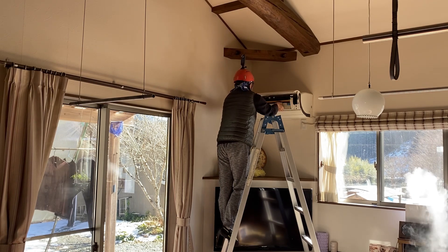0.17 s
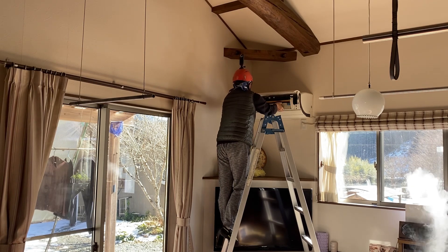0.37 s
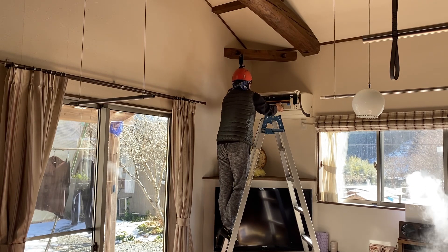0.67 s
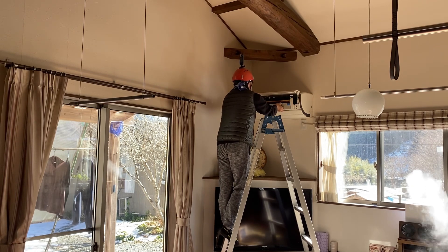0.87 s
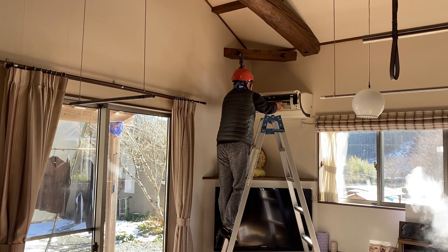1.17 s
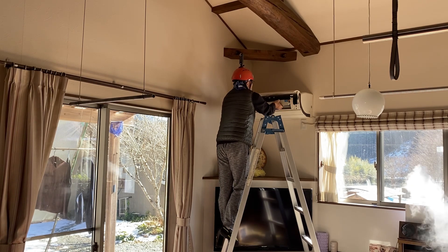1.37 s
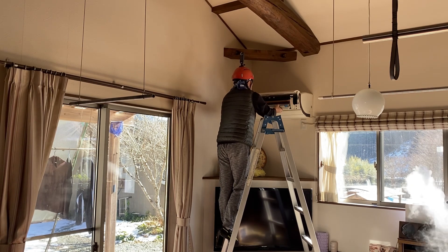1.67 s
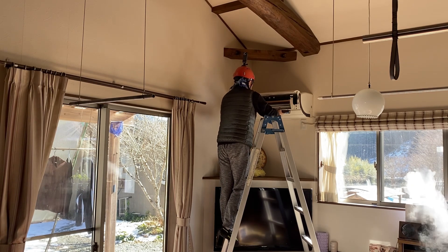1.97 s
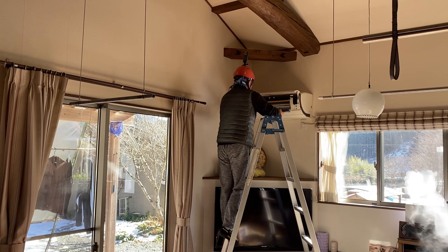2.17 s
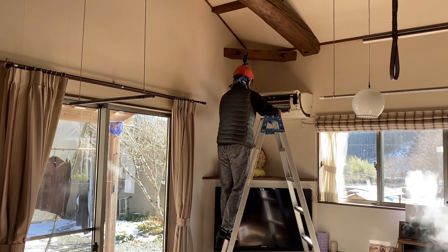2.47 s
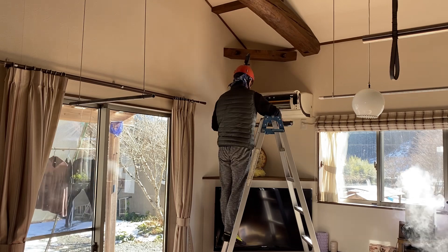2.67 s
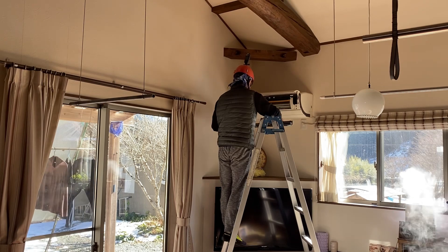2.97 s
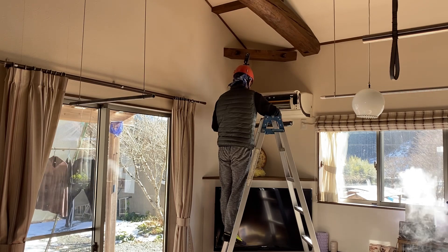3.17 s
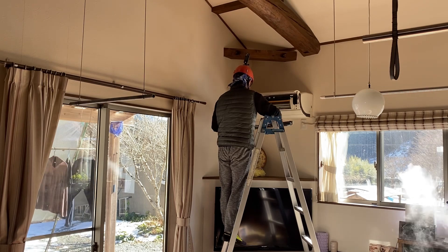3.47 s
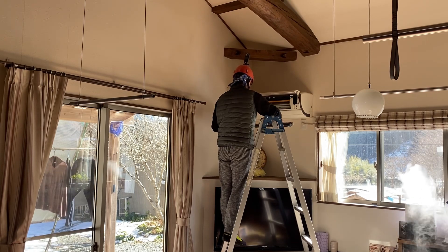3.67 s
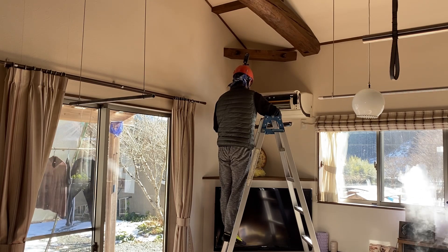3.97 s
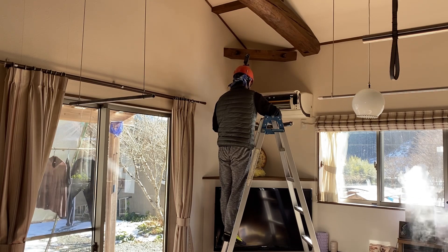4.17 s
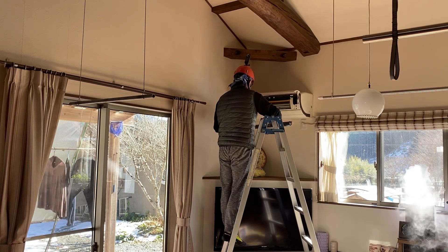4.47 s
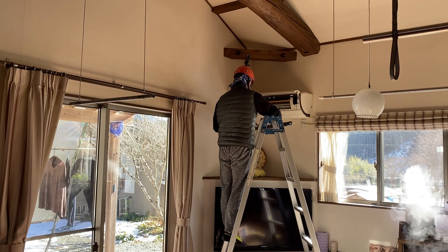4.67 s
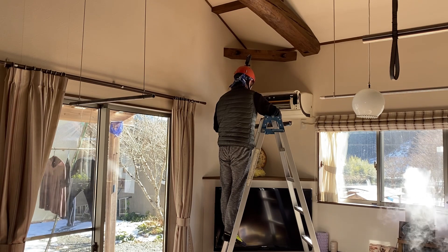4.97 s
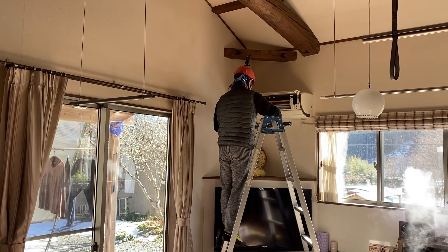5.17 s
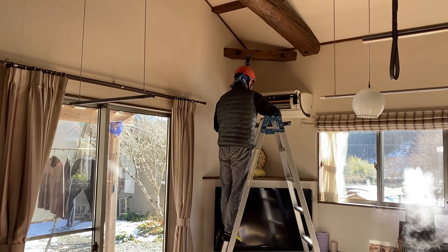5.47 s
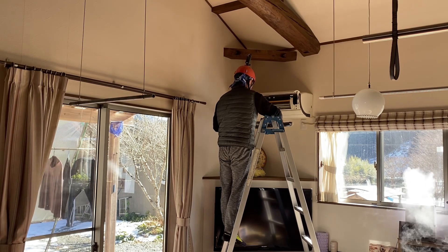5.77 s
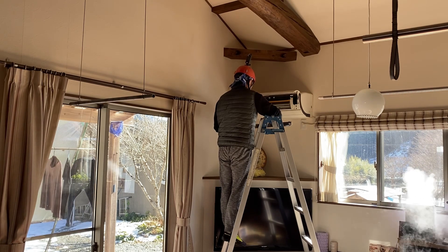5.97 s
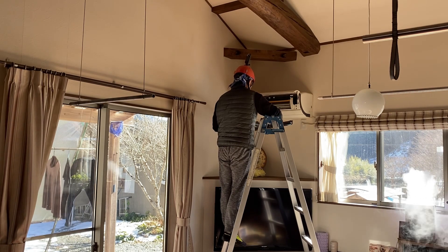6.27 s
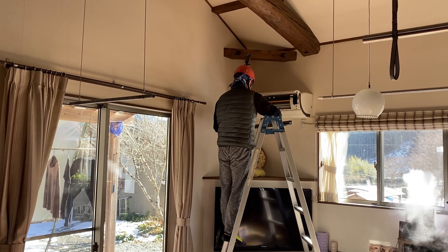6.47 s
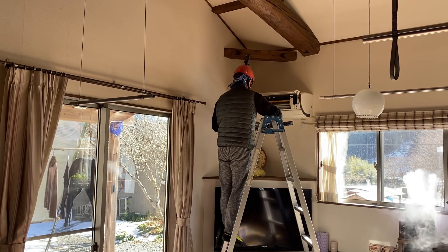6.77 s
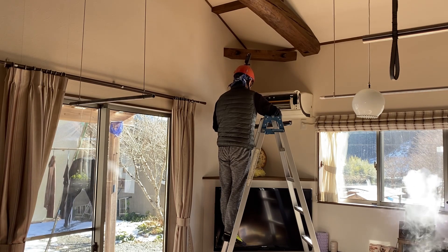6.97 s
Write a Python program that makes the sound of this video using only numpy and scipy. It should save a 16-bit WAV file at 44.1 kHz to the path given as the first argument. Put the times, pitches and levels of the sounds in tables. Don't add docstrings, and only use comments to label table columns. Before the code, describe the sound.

For the first 2.7 seconds a wooden room is fairly quiet, with a soft patchy outdoor wash and low rumble. Small birds beyond the glass give short chirrups and higher cheeps throughout. A worker on a ladder handles an air conditioner: light plastic knocks cluster around 0.5 seconds, with a dull floor thump, and the loudest hollow, ringing clatter comes at 1.2 to 1.4 seconds with rustling and a heavy shift of weight. It then settles to birds, faint rustles and a small tick near 2.5. At 2.7 a spray tool opens almost instantly. A much louder, dense, mid-bright hiss fills the unit's cavities, lightly resonant, with a thin motor whine around one kilohertz and its higher multiples fluttering in and out. Faint low thumps continue underneath, and one high cheep pokes through near 6.1. The spray holds steady until it stops abruptly at about 7.1. Phone stereo, modest room reverberation.

```python
import sys
import numpy as np
from scipy import signal
from scipy.fft import rfft, irfft
from scipy.io import wavfile
from scipy.ndimage import uniform_filter1d

SR = 44100
rng = np.random.default_rng(int(sys.argv[2]) if len(sys.argv) > 2 else 0)


def ratio_of_db(decibels):
    return 10 ** (np.asarray(decibels, float) / 20)


def master_out(mix):
    frames = np.transpose(np.atleast_2d(mix))
    ceiling = np.clip(frames, -1, 1)
    pcm = np.round(ceiling * 32767).astype(np.int16)
    wavfile.write(sys.argv[1], SR, pcm)


N = 313992
HZ = np.arange(N // 2 + 1) * SR / N
T = np.arange(N) / SR
SPRAY_FROM_S, STOPS_S = 2.703, 7.1088


def colour(x, table):
    hz, db = np.transpose(table)
    return irfft(rfft(x) * ratio_of_db(np.interp(np.log(HZ + 1), np.log(hz), db)), N)


def band(x, lo_hz, hi_hz):
    sos = signal.butter(2, [lo_hz, hi_hz], "bandpass", fs=SR, output="sos")
    y = signal.sosfilt(sos, x)
    return y / np.std(y)


def curves(table):
    return np.interp(T, *np.transpose(table))


def walk(rate_hz):
    k = int(SR / rate_hz)
    held = np.repeat(rng.standard_normal(N // k + 1), k)
    return 1.116 * uniform_filter1d(uniform_filter1d(held, k), k)[:N]


def swells(table, rise=0.99):
    total = 0
    for s, db, fade_s in table:
        time_constant_s = np.where(T < s, rise * fade_s, fade_s)
        total = total + ratio_of_db(db) * np.exp(-np.abs(T - s) / time_constant_s)
    return total


def spraying(rise_s):
    return np.clip((T - SPRAY_FROM_S) / rise_s, 0, 1) ** 1.6


def flicker(spectrum, edges_hz, slow_db, quick_db, rate_hz):
    total, octave = 0, np.log2(HZ + 1)
    for hz in 90 * 2 ** np.arange(0, 7.7, 1 / 3):
        offset = np.clip(octave - np.log2(hz), -1 / 3, 1 / 3)
        share = np.cos(1.5 * np.pi * offset) ** 2
        waver_db = slow_db * walk(rate_hz) + quick_db * walk(3 * rate_hz)
        total = total + irfft(spectrum * share, N) * ratio_of_db(waver_db)
    below = [0] + [1 / (1 + (HZ / edge) ** 40) for edge in edges_hz] + [1]
    parts = [irfft(rfft(total) * (upper - lower), N) for lower, upper in zip(below, below[1:])]
    return [p / np.std(p) for p in parts]


def room(x, wet_db):
    t60_s, treble_t60_s, onset_s = 0.6, 0.46, 0.0021
    t = T[:SR // 2]
    low = signal.lfilter([.15], [1, -.85], rng.standard_normal((2, len(t)))) * ratio_of_db(-60 * t / t60_s)
    treble = 0.47 * rng.standard_normal((2, len(t))) * ratio_of_db(-60 * t / treble_t60_s)
    tail = (low + treble) * np.clip(t / onset_s, 0, 1)
    tail = tail / np.sqrt(np.sum(tail ** 2, axis=1, keepdims=True))
    return irfft(rfft(x) * (1 + ratio_of_db(wet_db) * rfft(tail, N)), N)


# (time [s], bass cut [octaves])
WIND_CUT = [(0, 5), (.45, 0.5), (2.6, 0.5), (2.76, 1.5), (2.97, 1.8), (3.2, 2), (4.46, 2), (4.52, 1.56),
            (5.25, 1.6), (5.42, 2), (5.8, 2.5), (5.9, 1.3), (6.1, 1.5), (6.3, 1.5), (7.12, 1)]
# (time [s], level [dB], fade [s])
THUMPS = [(.3, -51, 0.043), (.55, -40.5, 0.11), (.73, -51, .08), (1.08, -60, .1), (1.35, -37, 0.081),
          (1.52, -53, 0.055), (1.84, -56, 0.18), (2.44, -49, 0.04), (2.58, -53, 0.11), (3.31, -69, 0.057),
          (4.72, -64, .04), (5.1, -55, 0.059), (5.39, -72, .05), (5.79, -67, .05), (6.17, -49, 0.07),
          (6.35, -44, .05), (6.55, -44, 0.15), (6.86, -48, 0.063)]


def rumble():
    steady_db = -58.5 - 9 * np.clip(curves(WIND_CUT), 0, 1) + 2.0 * walk(8)
    noise = band(band(rng.standard_normal((2, N)), 61, 142), 32, 280)
    return noise * (ratio_of_db(steady_db) + swells(THUMPS, rise=0.32) * ratio_of_db(-8.5))


# (frequency [Hz], density [dB per Hz])
AIR = [(170, -2), (500, -0.5), (1400, -1), (2000, 2), (2700, -6), (3200, -0.5), (3600, -1.5), (4600, 1.5),
       (5600, -8), (6600, -8), (7900, -3), (9000, -15), (10000, -5), (15000, -6)]
# (time [s], level over rest [dB])
STIR = [(0, 8.5), (.06, 6.5), (.33, 1), (.44, 4.5), (.51, 7), (.65, -1.5), (.87, 5.5), (1.2, 5), (1.28, 24),
        (1.42, 17.5), (1.54, 6), (1.57, 3.5), (1.7, 4.5), (2.3, 1), (2.48, 2), (2.7, 3)]
# (rest level [dB], follow [dB per dB of handling])
ZONES = [
    (-58.5, 1),
    (-53.5, 0.5924),
    (-57, .5),
    (-104, 2.13),
]
# (time [s], level [dB], fade [s])
RUSTLES = [(.09, -62, 0.073), (.4, -70, 0.06), (.49, -65, 0.077), (.735, -69, 0.036), (.87, -76, 0.093),
           (1.07, -71, 0.096), (1.24, -62, .04), (1.28, -53, 0.052), (1.7, -72, 0.056), (1.8, -74, 0.063),
           (1.97, -84, .015), (2.08, -86, .02), (2.49, -86, .02), (2.56, -88, .02)]


def wash():
    noise = rfft(colour(rng.standard_normal((2, N)), AIR))
    *parts, top = flicker(noise, [1400, 5500, 9800], slow_db=1.5, quick_db=2.5, rate_hz=8)
    *gains, top_gain = [ratio_of_db(rest_db + follow * curves(STIR)) for rest_db, follow in ZONES]
    rustle = top * (top_gain + swells(RUSTLES, rise=0.11)) * ratio_of_db(1.6 * walk(24.8))
    return sum(p * g for p, g in zip(parts, gains)) + rustle


def far_birds():
    return band(rng.standard_normal((2, N)), 3140, 3200) * ratio_of_db(-63 + 1.5 * walk(12))


def calls(table, sag):
    out = np.zeros(N)
    for s, hz, length_s, db in table:
        u = np.linspace(0, 1, int(length_s * SR))
        noise = rng.standard_normal((2, SR // 4))
        flutter = signal.lfilter(np.hanning(160), 1, noise)[:, 160:160 + len(u)] / 9
        tone = np.exp(2j * np.pi * np.cumsum(hz * (1 - sag * u)) / SR)
        rough = np.clip(0.8 - 0.035 * (db + 56), .1, .9)
        tone = np.real(tone * (1 - rough + rough * (flutter[0] + 1j * flutter[1])))
        envelope = np.minimum(u * length_s / .003, 1) * np.cos(u * np.pi / 2)
        i = int(s * SR)
        out[i:i + len(u)] += ratio_of_db(db) * tone * envelope
    return out


# (time [s], pitch [Hz], length [s], level [dB])
CHIRRUPS = [(0.023, 1703, 0.054, -50.5), (0.131, 2150, .05, -48), (.45, 3120, .03, -54),
            (0.735, 2020, 0.067, -50), (0.739, 3190, 0.04, -49), (0.819, 1940, 0.053, -49),
            (.9, 3190, .13, -73), (1.068, 2040, 0.052, -45), (1.118, 1980, .05, -49),
            (1.007, 3180, 0.036, -54), (1.64, 2070, 0.048, -46), (1.75, 3230, 0.05, -56),
            (1.821, 3220, 0.033, -49), (1.902, 1693, 0.065, -48.5), (2.029, 2130, 0.093, -50),
            (1.994, 3250, 0.063, -59), (2.036, 3130, .05, -51), (2.09, 3170, 0.048, -44),
            (2.23, 3230, 0.036, -54), (2.195, 2030, 0.037, -50), (2.312, 2066, 0.039, -49),
            (2.448, 3200, .05, -58), (2.522, 1482, 0.061, -51.5)]
# (time [s], pitch [Hz], length [s], level [dB])
CHEEPS = [(0.618, 5000, .03, -59), (.74, 4600, 0.034, -49), (0.76, 5300, 0.051, -51),
          (0.792, 7050, .07, -72), (0.814, 12400, .08, -72), (0.89, 4690, 0.038, -45.5),
          (0.931, 4700, 0.028, -53), (0.969, 4600, 0.017, -49), (1.102, 7700, 0.045, -49),
          (1.097, 6640, 0.057, -55), (1.172, 7000, 0.063, -50), (1.42, 7600, 0.083, -61),
          (1.604, 6400, 0.061, -53), (1.68, 4220, 0.061, -54), (1.876, 4520, 0.054, -46),
          (2.19, 4390, 0.022, -46), (1.455, 4050, .02, -44), (0.226, 4400, .015, -45),
          (2.236, 6550, 0.061, -55), (2.303, 8150, 0.032, -42), (2.33, 7100, 0.15, -54),
          (2.485, 5530, 0.034, -50), (2.482, 4660, 0.038, -46.5), (2.562, 7270, 0.088, -53),
          (2.675, 3930, 0.013, -45), (6.146, 7630, 0.073, -30.5)]


def birds():
    near = calls(CHIRRUPS, sag=0.0077) + calls(CHEEPS, sag=0.0247)
    return room(near * ratio_of_db(0.5), wet_db=-0.5)


# (time [s], level [dB], brightness [Hz], ring [s], left minus right [dB])
KNOCKS = [(0.101, -51, 1500, 0.062, 0), (.227, -52.5, 4000, 0.021, 2), (0.441, -51, 700, 0.074, -1),
          (0.4841, -38.5, 2600, 0.075, -1), (.503, -40.5, 1830, 0.056, 4), (.523, -46, 1500, 0.074, -3),
          (0.558, -51, 1200, 0.045, -3), (.8, -57, 700, .1, -1), (0.849, -55, 603, 0.067, 1),
          (.93, -63, 600, .12, -3), (0.979, -57.5, 580, 0.14, -1), (1.055, -52.5, 587, 0.082, -5),
          (1.105, -52, 1500, 0.051, -3), (1.16, -62, 600, 0.092, 5), (1.2368, -41, 4460, 0.078, -2),
          (1.2766, -33, 2340, 0.12, 0), (1.3, -38.5, 900, 0.1, -3), (1.3218, -28, 2140, 0.062, -0.5),
          (1.338, -40, 1500, 0.036, 8), (1.352, -47, 1490, 0.091, -4), (1.39, -42, 1170, 0.1, 2),
          (1.45, -51, 1200, 0.069, 4), (1.95, -53.5, 1400, 0.063, 3), (2.487, -48, 6000, 0.0096, -3)]
# (frequency [Hz], level [dB], t60 [s])
HOUSING = [(110, -25, 0.13), (249, -8, 0.14), (433, -33, 0.19), (582, 3.5, 0.12), (852, -17, 0.21),
           (1070, 2.5, 0.14), (1500, -8, .05), (1888, 8.5, 0.042), (2500, -3, 0.056), (3270, -12, .05),
           (4270, -11, .05)]


def knocks():
    out, t = np.zeros((2, N)), T[:SR // 4]
    hz, db, t60_s = np.transpose(HOUSING)[:, :, None]

    def burst(lo_hz, hi_hz, decay_s):
        return band(rng.standard_normal(len(t)), lo_hz, hi_hz) * ratio_of_db(-60 * t / decay_s)

    for s, blow_db, bright_hz, ring_s, pan_db in KNOCKS:
        sizes = ratio_of_db(db + 4.7 * rng.standard_normal(db.shape)) / np.sqrt(1 + (hz / bright_hz) ** 2)
        waves = np.sin(2 * np.pi * hz * t + 6 * rng.random(db.shape))
        modes = np.sum(sizes * ratio_of_db(-60 * t / t60_s) * waves, axis=0)
        crack = burst(bright_hz / 4, min(bright_hz, 9000), 0.55 * ring_s)
        body = burst(bright_hz / 6.04, bright_hz / 1.5, 1.15 * ring_s)
        tick = burst(2200, 6800, 0.079)
        blow = 0.22 * modes + 2.54 * crack + 1.4 * body + 0.47 * tick
        blow = blow * np.minimum(t / 0.0036, 1)
        i = int(s * SR)
        out[:, i:i + len(t)] += blow * ratio_of_db(blow_db + np.array([[pan_db], [-pan_db]]) / 2)
    return room(out, wet_db=2.5)


# (time [s], level [dB], fade [s])
SWAYS = [
    (.6, -61, .12),
    (1.36, -47, 0.11),
    (1.55, -60, .08),
]


def boards():
    return band(rng.standard_normal(N), 26, 51) * swells(SWAYS, rise=.5)


# (frequency [Hz], density [dB per Hz])
JET = [(60, -71), (200, -15), (400, -8.5), (700, -5.5), (1500, -6), (2300, -6), (3100, -3.5), (3500, -9.5),
       (4500, -4), (6500, -4.5), (7700, -5), (9000, -9), (13000, -21.5), (16000, -26)]
# (frequency [Hz], width [Hz], level over the jet [dB])
CAVITY = [(697, 19, 3), (816, 25, -1), (980, 15, -15), (1064, 325, -4.5), (1084, 35, 1), (1830, 24, -2),
          (2140, 20, 6), (2460, 33, 0), (1316, 49, 7.5), (1696, 48, 7.5), (1904, 180, 6.5), (2830, 410, -1),
          (4780, 100, -7)]
# (level [dB], cut withstood [octaves])
JET_BASS = [(-62, 0.8), (-54, 1.09), (-54, 1.46)]


def spray():
    jet_db, rise_s, cut_db_per_octave = -29, 0.039, 15.5
    lift = 1 + sum(ratio_of_db(db) / (1 + (2 * (HZ - hz) / width_hz) ** 2) for hz, width_hz, db in CAVITY)
    jet = rfft(room(colour(rng.standard_normal((2, N)), JET), wet_db=-6.0)) * lift
    *edge, hiss = flicker(jet, [195, 255, 335], slow_db=0.58, quick_db=1.0, rate_hz=4)
    cut = curves(WIND_CUT) + 0.15 * walk(6)
    bass = 0
    for part, (db, octaves) in zip(edge, JET_BASS):
        bass = bass + part * ratio_of_db(db - cut_db_per_octave * np.clip(cut - octaves, 0, 1))
    return (hiss * ratio_of_db(jet_db) + bass) * spraying(rise_s)


# (time [s], frequency [Hz])
MOTOR = [(2.7, 7325), (3.35, 7333), (4.15, 7323), (4.5, 7332), (5.2, 7340), (6.1, 7343), (6.5, 7336),
         (7.12, 7330)]
# (time [s], level [dB], fade [s])
SWELLS_1 = [(3.02, -41, 0.078), (3.5, -51, .1), (3.77, -46, .08), (4.11, -41, 0.073), (4.78, -54, 0.053),
            (4.9, -47, 0.11), (5.52, -46, 0.049), (5.97, -36.5, 0.067), (6.35, -40, 0.053), (6.52, -52, .1)]
# (time [s], level [dB], fade [s])
SWELLS_4 = [(2.79, -42, 0.028), (2.85, -37, 0.035), (2.93, -47, .04), (3.33, -42.5, 0.077),
            (3.65, -46, 0.12), (3.83, -42.5, 0.064), (4.1, -50, .04), (4.25, -43.5, .05), (4.8, -50, 0.15),
            (5.1, -48, 0.089), (5.37, -40, 0.049), (5.52, -40.5, 0.025), (5.74, -46, 0.046),
            (5.85, -34, 0.035), (6.12, -45, .05), (6.36, -42, 0.044), (6.5, -47, .04), (6.58, -38, 0.03),
            (6.72, -39, 0.043), (6.86, -38.5, 0.034), (7.05, -41, 0.055)]
# (time [s], level [dB], fade [s])
SWELLS_7 = [(2.75, -36, 0.07), (3.02, -38.5, 0.072), (3.32, -32, 0.04), (3.4, -31, 0.044), (3.7, -43, 0.35),
            (4.12, -36.5, 0.037), (4.38, -50, 0.087), (4.47, -31, 0.078), (4.72, -32, 0.015),
            (4.84, -34, 0.035), (5.05, -41.5, 0.32), (5.35, -35, 0.048), (5.52, -39, 0.046),
            (5.64, -40, 0.052), (5.74, -32, 0.021), (5.85, -40, .04), (6.18, -35, 0.057),
            (6.32, -30, 0.015), (6.43, -34, 0.037), (6.7, -37, 0.13), (6.85, -38.5, 0.048),
            (6.95, -38, 0.024), (7.08, -39, 0.049)]
# (multiple [1], level [dB])
WHINE_WEAK = [(2, -58), (3, -61), (8, -60), (14, -70)]


def whine():
    jitter = 1 + 0.00059 * walk(30) + .0005 * walk(10)
    turn = 2 * np.pi * np.cumsum(curves(MOTOR) / 7 * jitter) / SR
    lines = [(1, swells(SWELLS_1) + ratio_of_db(-48), np.pi * .8),
             (4, (swells(SWELLS_4) + ratio_of_db(-55)) * ratio_of_db(2.6 * walk(45) - 3), 1.62),
             (7, (swells(SWELLS_7) + ratio_of_db(-53.5)) * ratio_of_db(-1.5), 0.72)]
    lines += [(k, ratio_of_db(db + 3.5 * walk(6)), .6) for k, db in WHINE_WEAK]
    total = 0
    for k, gain, lead in lines:
        wave = np.sin(k * turn + np.array([[lead], [0]]))
        total = total + np.sqrt(2) * gain * ratio_of_db(3.6 * walk(30)) * wave
    return spraying(0.018) * total


def scene():
    quiet = (wash() + far_birds()) * (1 - spraying(0.045))
    return rumble() + quiet + birds() + knocks() + boards() + spray() + whine()


# (frequency [Hz], side share [0-1], left minus right [dB])
PORTS = [(40, 0.11, 0), (250, 0.42, -0.5), (700, 0.79, -0.5), (1310, 0.85, -0.5), (2260, 0.48, 0),
         (3900, 0.51, -4.5), (5600, 0.67, -2.5), (7230, 0.54, 0.5), (8900, 0.12, 0.5), (13500, 0.5, -0.5),
         (16000, 0, -1.5)]
# (frequency [Hz], left lead [half turns])
LEAD = [(1500, 0), (2600, -.12), (5600, -.2), (6600, 0), (7500, .5), (8450, .97), (9750, 1.03),
        (10500, 1.5), (11300, 1.98), (13000, 2.02), (13900, 2.6), (14500, 3)]


def ports(dry):
    hz, share, pan_db = np.transpose(PORTS)
    share, pan_db = np.interp(HZ, hz, share), np.interp(HZ, hz, pan_db)
    lead = np.interp(HZ, *np.transpose(LEAD))
    sign = np.array([[1], [-1]])
    mid, side = rfft(dry[0] + dry[1]) / 2, rfft(dry[0] - dry[1]) / 2
    both = (mid + sign * share * side) * np.sqrt(2 / (1 + share ** 2))
    return irfft(both * ratio_of_db(sign * pan_db / 2) * np.exp(.5j * np.pi * sign * lead), N)


def top_cut(x):
    return signal.sosfilt(signal.butter(12, 15750, fs=SR, output="sos"), x)


def record(dry):
    dip_s, dip_length_s = 2.7035, .004
    x = ports(dry)
    x = x * np.minimum(np.abs(T - dip_s) / dip_length_s, 1)
    x = x * np.clip((STOPS_S - T) / .001 + 1, .03, 1)
    return top_cut(x)


dry = scene()
out = record(dry)
master_out(out)
```